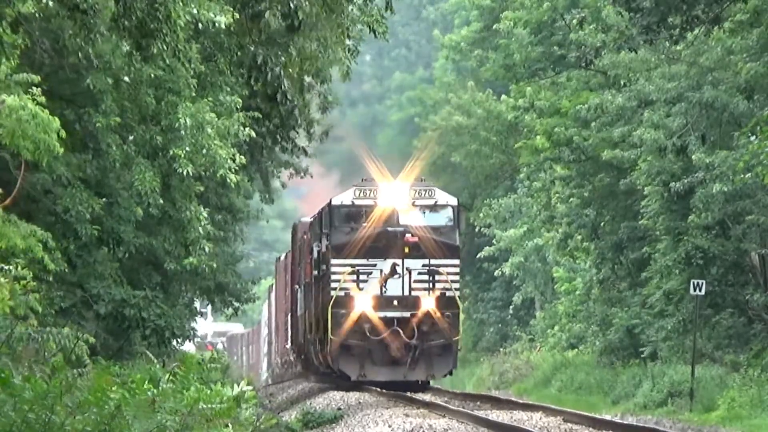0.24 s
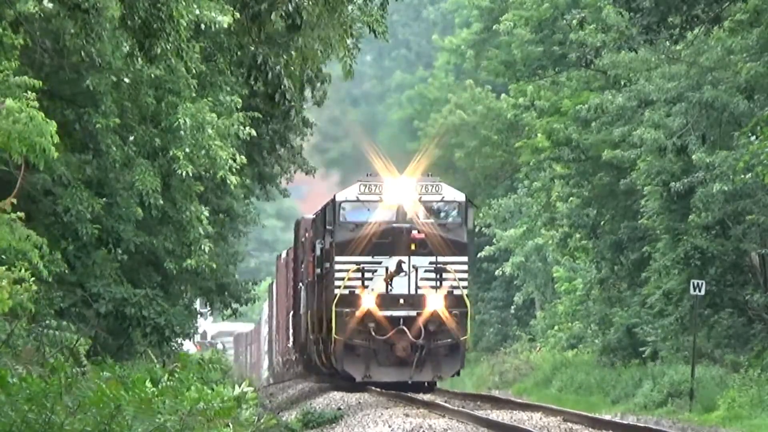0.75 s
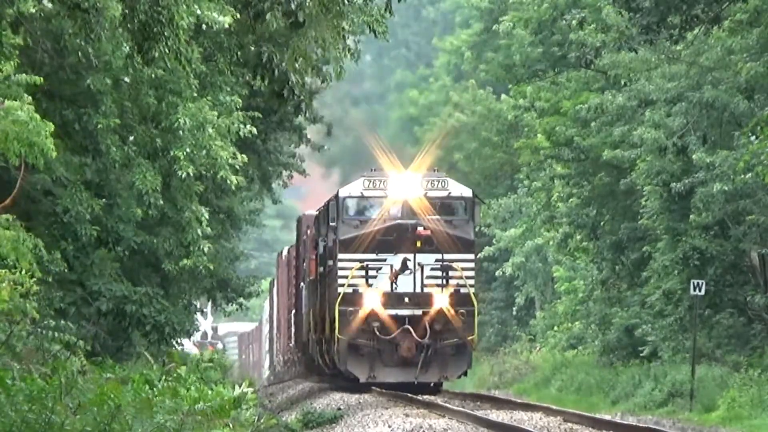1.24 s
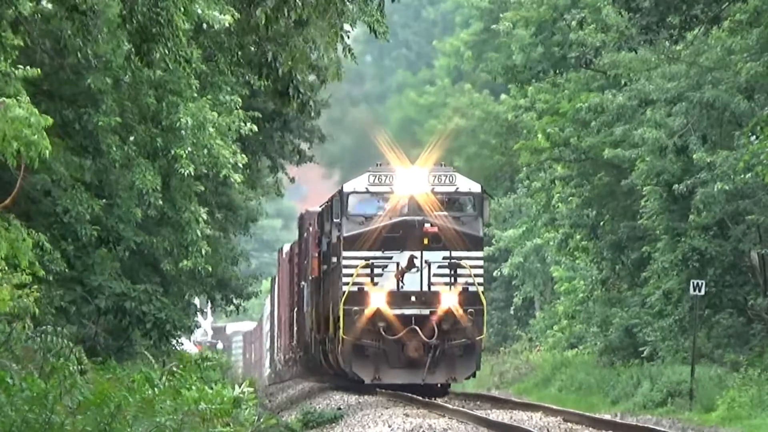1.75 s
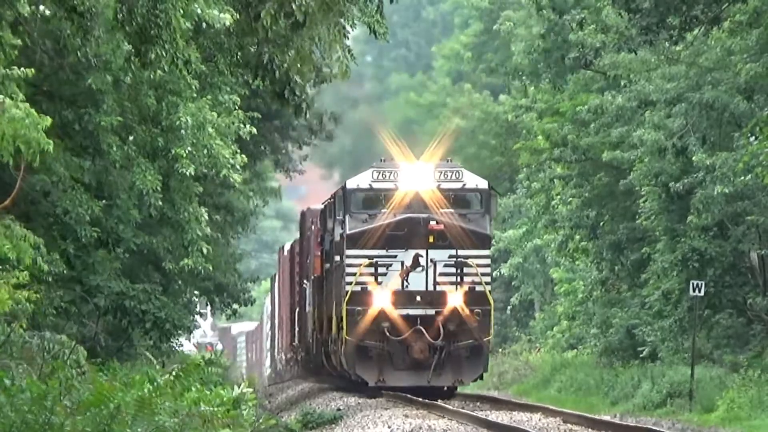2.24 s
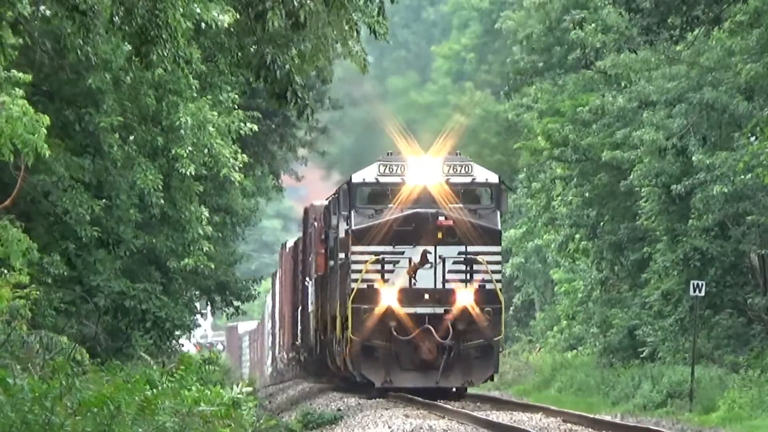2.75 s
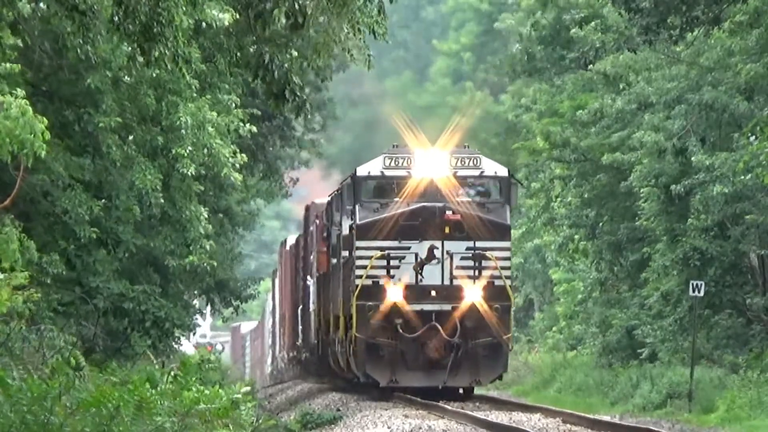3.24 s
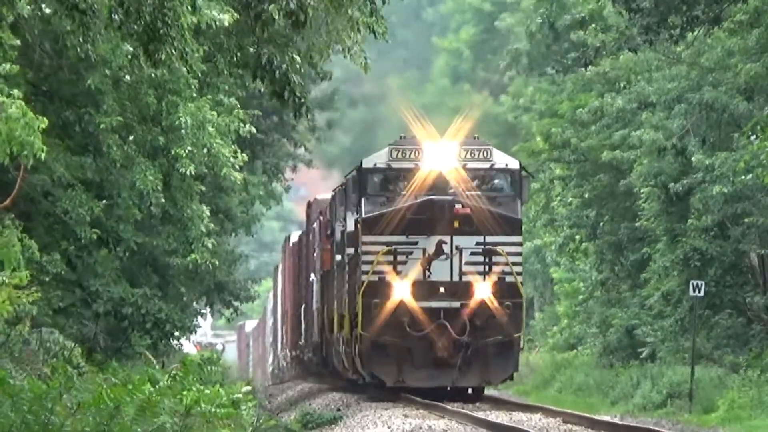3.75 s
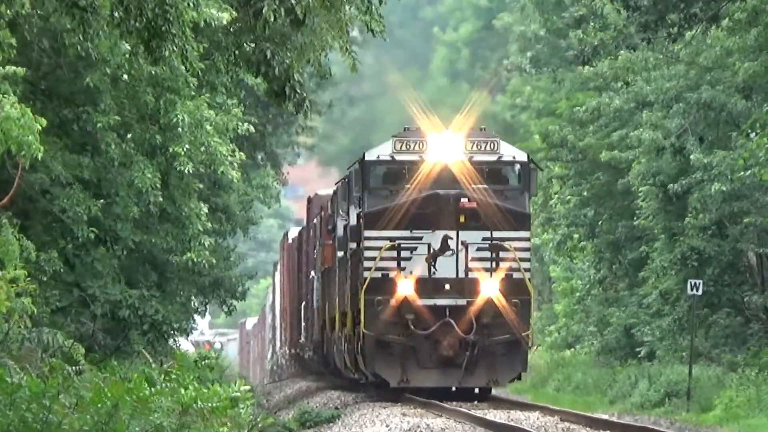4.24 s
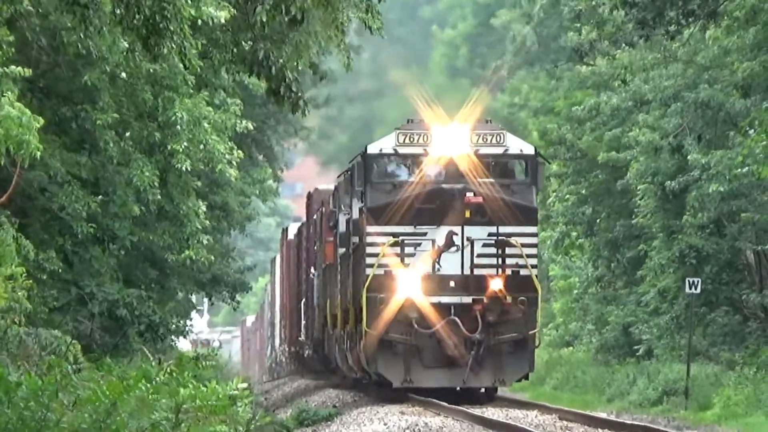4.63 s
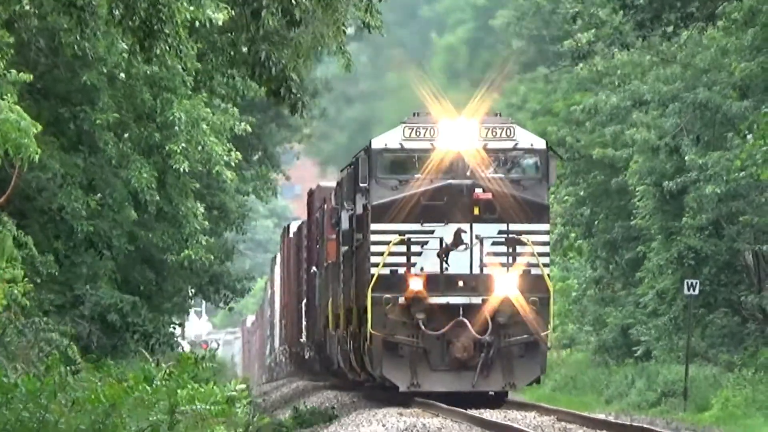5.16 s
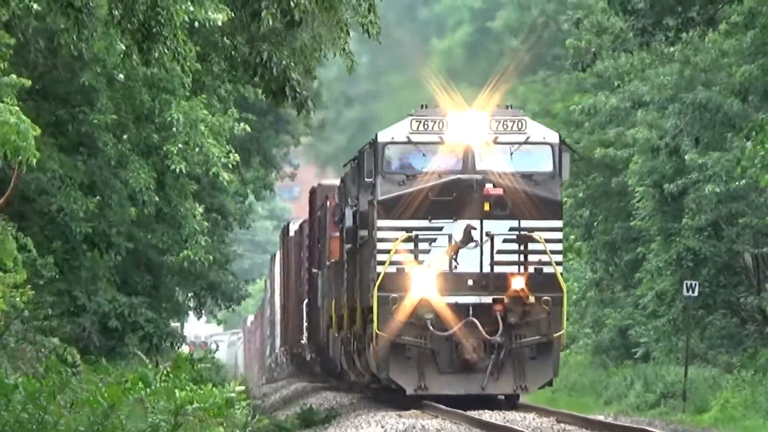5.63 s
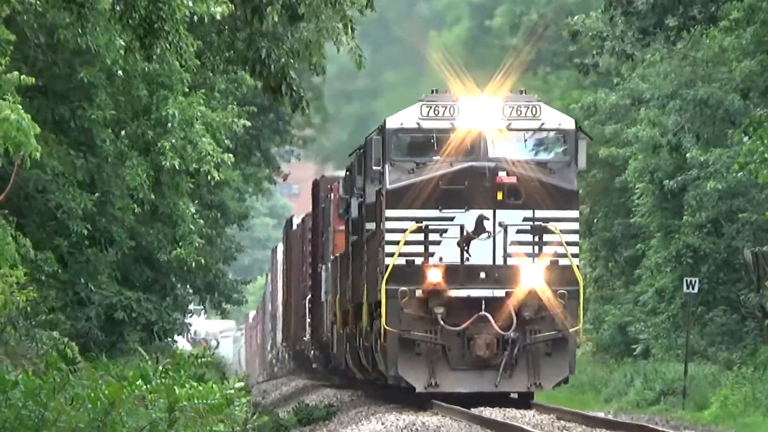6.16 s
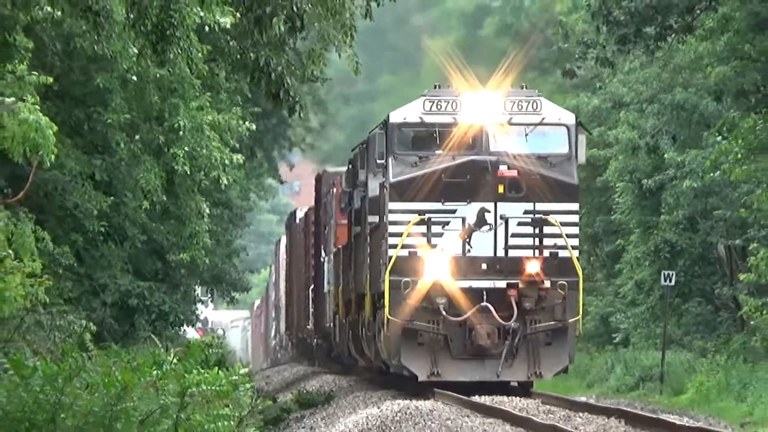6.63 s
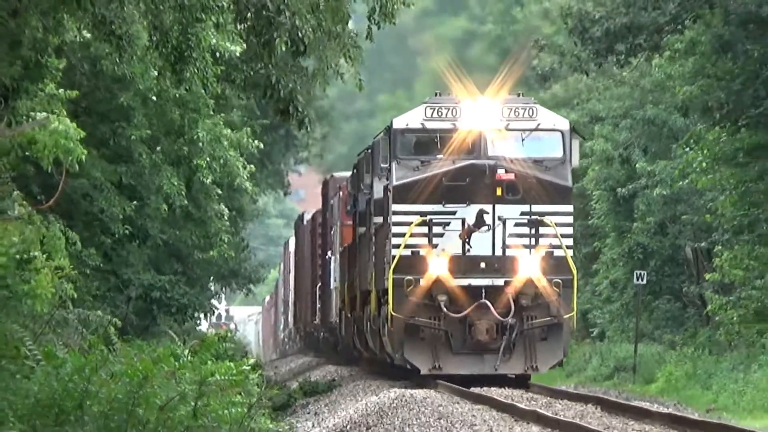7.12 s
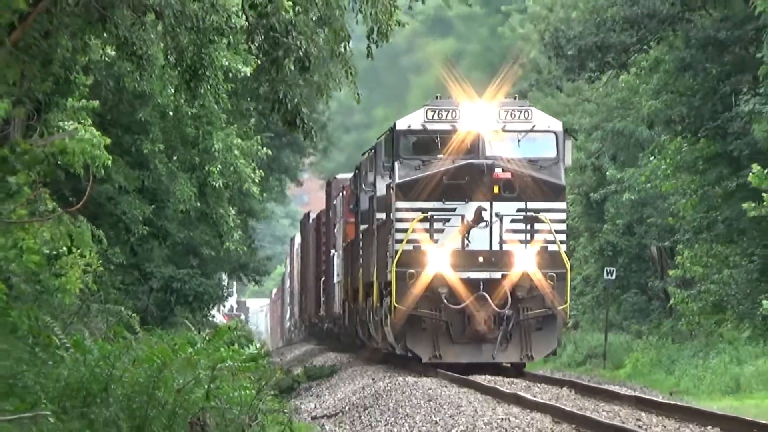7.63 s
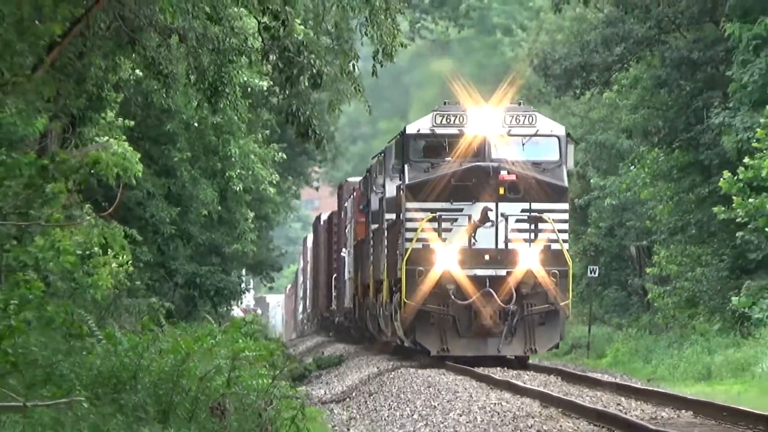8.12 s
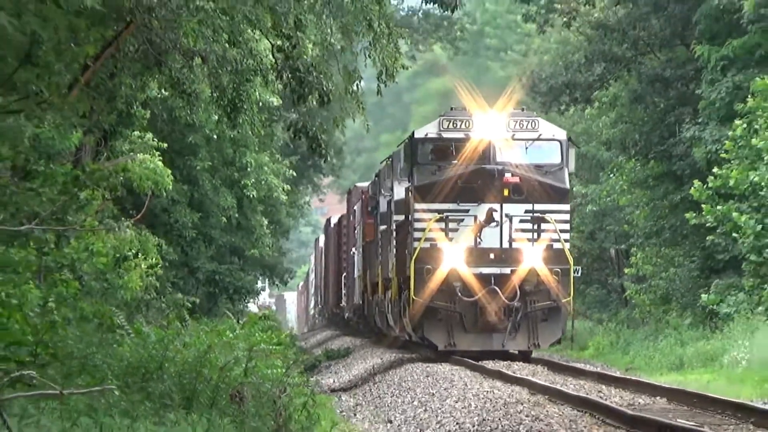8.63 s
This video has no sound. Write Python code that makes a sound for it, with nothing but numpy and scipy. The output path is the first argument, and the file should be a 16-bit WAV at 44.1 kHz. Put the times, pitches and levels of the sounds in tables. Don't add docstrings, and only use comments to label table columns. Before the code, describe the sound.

From 0 s a diesel freight locomotive drones at a distance: a steady low hum around 90 to 120 Hz, slightly rough, pulsing about eight times a second, with low rumble and muffled exhaust roar. Between 0.6 and 2.3 s a far bird gives short, gliding whistles, barely above the train, with a few last chirps near 2.7 to 3.2 s. Two soft dry twig rustles come close to the microphone around 0.9 to 1 s. From 3 to 5 s the train clears the trees; resonant panel noise and fan rush grow. At about 5.5 s there is one brief crisp rustle. By 6 to 7 s the roar is broader and brighter, with hissing steel wheels. The engine note keeps swelling, its pitch constant, until the loudest moment at 8.9 s, where everything stops suddenly. Thin electronic hiss and very faint high whine persist beneath, in open-air stereo with slightly heavier bass at right.

```python
import sys
import numpy as np
from scipy import signal
from scipy.fft import rfft, irfft, next_fast_len
from scipy.io import wavfile
from scipy.ndimage import uniform_filter1d, map_coordinates

SR = 44100
rng = np.random.default_rng(int(sys.argv[2]) if len(sys.argv) > 2 else 0)


def undo_db(level):
    steps = np.asarray(level, float) / 20
    return 10 ** steps


def generate_wav(signal):
    frames = np.transpose(np.atleast_2d(signal))
    scaled = np.clip(frames, -1, 1) * 32767
    pcm = np.round(scaled).astype(np.int16)
    wavfile.write(sys.argv[1], SR, pcm)


N = 391608
TIME = np.arange(N) / SR
CYCLE_HZ = 7.7726

# (time [s], level of the 12th order [dB])
ENGINE_NOTE = [(0, -31.1), (1.2, -29.9), (2.3, -27.6), (2.8, -28.4), (3.3, -27), (4, -27.5), (5.5, -26),
               (6.1, -23.3), (7.6, -23.1), (8, -22.5), (8.87, -19.7)]
NOTE_PARTS = {"15th": .3, "9th": -11, "6th": -16, "growl": -14}
NOTE_ECHOES = {"15th": [(1.5, .4, -1.5), (2.4, .3, -3), (3.1, .45, -3.3), (5.2, .3, 1), (6.25, .5, -3),
               (7.2, .25, -1.5), (8.9, .55, -5.6)], "9th": [(.1, .9, -8.5), (2.4, .45, -9.5),
               (6.3, .85, -9.5), (8.2, .45, -4.5)], "6th": [(1.8, .55, -7.5), (3.3, 1.1, -12),
               (8.25, .4, -5.5)], "growl": [(.8, .25, -2.5), (2.2, .8, -4), (3.3, .35, 4),
               (5.25, .35, -4.5), (6.1, .3, 2), (7.1, .25, -3), (8.1, .5, 1.5)]}
# (multiple of the cycle [1], level re the note [dB])
WEAK_ORDERS = [(3, -42), (5, -31), (7, -27), (8, -31), (10, -15), (11, -11), (13, -11.5), (14, -12),
               (16, -13), (17, -32), (18, -17), (19, -23), (20, -22), (21, -26), (22, -23), (23, -28)]
# (multiple of the cycle [1], level re the growl [dB])
GROWL_ORDERS = [(24, -10.5), (25, -22), (26, -13), (27, -4), (28, -4.5), (29, -8.5), (34, -14), (35, -13.5),
                (42, -19), (44, -25), (46, -16), (47, -15.5)]
STACK_DELAY = {5: -.15, 7: -.35, 10: .2, 11: .2, 13: -.125, 14: .2, 16: .2, 18: -.1, 19: .4, 21: .4, 22: .5,
               28: .5}
# (frequency [Hz], density [dB])
RUMBLE_SHAPE = [(12, -10), (25, 3), (40, 12), (60, 11.5), (100, 16), (125, 21.5), (140, 7), (180, 13),
                (215, 6), (250, -6), (330, -34), (800, -120)]
# (frequency [Hz], density [dB])
EXHAUST_SHAPE = [(60, -120), (120, -64), (200, 2.5), (260, -1), (370, -1.5), (460, -2), (540, -1.5),
                 (680, -6.5), (760, -10.5), (1000, -52), (2000, -120)]
# (time [s], half length [s], level [dB])
PLUME_SWAYS = [
    (.7, 0.23, -0.5),
    (3, 0.61, -0.5),
    (4.55, 0.24, -1),
    (6.1, .3, -1.5),
    (7, .2, -1.3),
    (8.05, .2, -0.5),
    (8.5, .3, .8),
]
# (time [s], level [dB])
CLEARING = [(0, 0), (2, 0.8), (3.5, 2.5), (4.5, 4), (5, 5.5), (5.6, 8), (6.4, 8.5), (7.1, 10.5), (7.9, 9.5),
            (8.87, 10.5)]
# (centre [Hz], width [Hz], far level [dB], near level [dB])
PANEL_RINGS = [(364.5, 6.3, 5.5, -1), (529, 40, -1.5, -1), (740, 13, -6, 0.5), (854, 78, 1.5, 0),
               (904, 60, 0, 0), (1018, 40, -11, -1), (1100, 22, -0.5, 0.5), (1286, 160, -2, -1),
               (1414, 104, -4, -2), (1702, 140, -2, -1), (1797, 150, -4, -4.5), (1410, 12, -4, -0.5),
               (1808, 14, -0.5, -2.5), (546.5, 12, 2, 1.5)]
# (frequency [Hz], density [dB])
FAN_SHAPE = [(500, -120), (1200, -32), (1900, -1), (2200, 0), (3200, -2.5), (4200, -4), (5300, -9),
             (5900, -15), (6500, -57), (9000, -120)]
# (frequency [Hz], density [dB])
WHEEL_SHAPE = [(1000, -120), (2500, -27), (3600, -1.5), (5200, 6), (6000, 1), (6600, -0.5), (7600, 0.5),
               (8300, -3), (9000, -4.5), (10500, -11), (12500, -21), (16000, -60)]
# (centre [Hz], width [Hz], level [dB])
BALLAST_DIPS = [(744, 17, -3), (970, 30, 2), (1124, 37, -2.5), (1502, 36, -4), (1880, 45, -0.5),
                (2296, 53, -7.5)]
# (time [s], level [dB], 60 dB decay [s])
RUSTLES = [
    (.927, -53, .12),
    (.988, -56, .15),
    (5.53, -51, .05),
]
# (frequency [Hz], density [dB])
LEAF_SHAPE = [(2000, -60), (4500, -6), (6500, 0), (9000, 0), (11500, -3), (15000, -16)]
# (time [s], length [s], start pitch [Hz], end pitch [Hz], level [dB])
BIRD_NOTES = [(.635, .05, 3550, 3300, -62), (.63, 0.041, 2950, 2650, -57), (.745, 0.073, 2600, 3050, -56),
              (1.18, 0.17, 2440, 2340, -60), (1.4, 0.22, 2200, 2330, -63), (.82, 0.089, 2850, 2100, -62),
              (3, .06, 2800, 2800, -61), (1.32, 0.036, 2200, 2400, -59), (1.62, .05, 2750, 3300, -61),
              (1.68, 0.046, 2750, 2400, -56), (1.735, 0.037, 3600, 3550, -59),
              (1.74, 0.063, 3080, 2420, -56.5), (2.2, 0.062, 3000, 2750, -57),
              (2.66, 0.042, 3000, 3000, -54), (3.205, 0.048, 4620, 4620, -61)]
# (frequency [Hz], density [dB])
HISS_SHAPE = [(1500, -20), (3000, 3), (6000, -12), (9000, -2.5), (12000, 0), (15700, -2.5)]
# (frequency [Hz], rms level [dB])
WHINE_TONES = [(7852.2, -83), (7881.8, -83), (7912, -90), (15734, -86)]
# (frequency [Hz], correlation [1])
LIKENESS = [(60, 0.78), (130, 0.9), (290, 0.75), (640, 0.64), (1410, 0.93), (3100, 0.91), (5000, 0.98),
            (8000, 0.94)]
# (frequency [Hz], left minus right [dB])
BALANCE = [(25, -13), (60, -7.5), (110, -6), (200, -2), (380, -.5), (700, .5), (1290, 1.5), (2380, -1),
           (6000, 0)]
# (frequency [Hz], phase by which left leads [rad])
LEFT_LEADS = [(60, 0.31), (340, 0.81), (860, 0.003), (1400, 0), (16000, 0.047)]


def unit(x):
    return x / np.sqrt(np.mean(x ** 2) + 1e-20)


def along(points, hz):
    f, v = np.transpose(points)
    return np.interp(np.log(hz + 1), np.log(f + 1), v)


def shape(points):
    return lambda hz: undo_db(along(points, hz))


def over_time(points):
    s, db = np.transpose(points)
    return np.interp(TIME, s, db)


def passing(rows):
    return sum(db * np.exp(-((TIME - s) / half) ** 2) for s, half, db in rows)


def wobble(rate):
    knots = rng.standard_normal(200)
    return map_coordinates(knots, [TIME[::64] * rate]).repeat(64)[:N]


def filtered(x, response):
    m = next_fast_len(N + 8192)
    return irfft(rfft(x, m) * response(np.fft.rfftfreq(m, 1 / SR)), m)[..., :N]


def rush(gain, patchy_db):
    z = signal.stft(rng.standard_normal((2, N)), nperseg=512)[2]
    field = uniform_filter1d(rng.standard_normal(z.shape[1:]), size=6, axis=0)
    field = uniform_filter1d(field, size=14, axis=1)
    pair = signal.istft(z * undo_db(patchy_db * unit(field)), nperseg=512)[1][:, :N]

    def spread(hz):
        turn = np.arccos(np.clip(along(LIKENESS, hz), -1, 1)) / 2
        return gain(hz) * np.array([np.cos(turn), np.sin(turn)])

    mid, side = filtered(pair, spread)
    return np.array([mid + side, mid - side]) / np.std(mid)


def order(multiple, sway_db, drift):
    strongest_s = .0608
    cycles = multiple * CYCLE_HZ * (TIME - strongest_s) - STACK_DELAY.get(multiple, 0)
    bank = 1 if multiple % 12 == 6 else -1
    level = bank * np.sqrt(2) * undo_db(sway_db * wobble(1.4))
    return level * np.cos(2 * np.pi * cycles + drift * wobble(1.17))


def drone():
    main_db = over_time(ENGINE_NOTE)
    part_db = {name: main_db + db + passing(NOTE_ECHOES[name]) for name, db in NOTE_PARTS.items()}
    note = undo_db(main_db) * order(12, sway_db=0, drift=.06)
    note = note + undo_db(part_db["15th"]) * order(15, sway_db=0, drift=.1)
    note = note + undo_db(part_db["9th"]) * order(9, sway_db=0, drift=.9)
    note = note + undo_db(part_db["6th"]) * order(6, sway_db=0, drift=.4)
    nearness_db = uniform_filter1d((main_db + part_db["15th"]) / 2, size=SR, mode="nearest")
    weak = sum(undo_db(db) * order(k, sway_db=1.2, drift=.2) for k, db in WEAK_ORDERS)
    growl = sum(undo_db(db) * order(k, sway_db=2, drift=.9) for k, db in GROWL_ORDERS)
    growl = undo_db(part_db["growl"] - 0.5) * growl
    rumble = undo_db(nearness_db - 11) * rush(shape(RUMBLE_SHAPE), patchy_db=.5)
    return note + blower(nearness_db) + undo_db(nearness_db) * weak + growl + rumble


def blower(nearness_db):
    level_db = nearness_db - 29.5 + 2.5 * wobble(1.1)
    return undo_db(level_db) * np.sin(2 * np.pi * 26.2 * TIME + .8 * wobble(.9))


def roar():
    angle = 2 * np.pi * CYCLE_HZ * TIME
    beat = np.cos(angle - 1.2 + 1.5 * wobble(0.61))
    beat = beat + .5 * np.cos(2 * angle - 2.1) + .5 * np.cos(3 * angle - .7)
    gust = wobble(9)
    open_db = over_time(CLEARING)
    near = np.pi / 2 * np.clip((TIME - 4) / 2.6, 0, 1)
    train = exhaust(beat) + bodywork(open_db, near, beat, gust)
    train = train + fans(open_db, near, beat, gust) + wheels(open_db, beat, gust)

    def ballast(f):
        return undo_db(sum(db * np.exp(-((f - c) / (w / 2)) ** 2) for c, w, db in BALLAST_DIPS))

    return filtered(train, ballast)


def exhaust(beat):
    engine_db = over_time(ENGINE_NOTE)
    level_db = -39.5 + 0.68 * (engine_db - engine_db[0]) + passing(PLUME_SWAYS)
    return undo_db(level_db + 0.22 * beat) * rush(shape(EXHAUST_SHAPE), patchy_db=.5)


def bodywork(open_db, near, beat, gust):
    screen_db = -3.5 * np.exp(-TIME / 1.44)
    level_db = -38.5 + 0.59 * open_db + screen_db
    far_ring = np.cos(near) * rush(panels(column=0), patchy_db=.5)
    near_ring = np.sin(near) * rush(panels(column=1), patchy_db=.5)
    return undo_db(level_db + 0.067 * beat + 0.12 * gust) * (far_ring + near_ring)


def panels(column):
    def gain(f):
        power = sum(undo_db(2 * dbs[column]) / (1 + ((f - c) / (w / 2)) ** 2) for c, w, *dbs in PANEL_RINGS)
        return np.sqrt(power) / (1 + (f / 2300) ** 6) * (f > 200)

    return gain


def fans(open_db, near, beat, gust):
    level = undo_db(-44.5 + open_db + 0.54 * beat + 0.1 * gust)
    clear = level * rush(shape(FAN_SHAPE), patchy_db=0.64)
    dulled = filtered(clear, lambda f: undo_db(1.84 - 3.5 * (f / 4500) ** 2))
    return dulled + np.sin(near) ** 2 * (clear - dulled)


def wheels(open_db, beat, gust):
    level_db = -58 + 1.17 * open_db
    return undo_db(level_db + 0.49 * beat + 0.21 * gust) * rush(shape(WHEEL_SHAPE), patchy_db=0.74)


def twig():
    puffs = sum(undo_db(db - 60 * np.abs(TIME - s) / t60) * (TIME > s) for s, db, t60 in RUSTLES)
    return puffs * unit(filtered(rng.standard_normal(N), shape(LEAF_SHAPE)))


def bird():
    song = np.zeros(N)
    for s, length, start_hz, end_hz, db in BIRD_NOTES:
        count = round(length * SR)
        pitch = np.linspace(start_hz, end_hz, count)
        whistle = np.hanning(count) * np.sin(2 * np.pi * np.cumsum(pitch) / SR)
        song[round(s * SR):][:count] += undo_db(db + 13.5) * whistle
    trees = rng.standard_normal((2, SR // 4)) * undo_db(-60 * TIME[:SR // 4] / 0.41)
    trees = trees / np.linalg.norm(trees[0])
    echoes = signal.fftconvolve(song[None], trees, axes=1)[:, :N]
    return song + undo_db(-2.5) * echoes


def camera():
    def band(hz):
        return shape(HISS_SHAPE)(hz) * (hz > 1500) * (hz < 15745)

    hiss = undo_db(-62.0) * unit(filtered(rng.standard_normal(N), band))
    whine = sum(np.sqrt(2) * undo_db(db) * np.sin(2 * np.pi * hz * TIME) for hz, db in WHINE_TONES)
    return hiss + whine


def scene():
    return drone() + roar() + twig() + bird()


def band_limit(x):
    return signal.sosfilt(signal.butter(12, 15745, fs=SR, output="sos"), x)


def record(dry):
    side = np.array([[.5], [-.5]])

    def ports(hz):
        return undo_db(side * along(BALANCE, hz)) * np.exp(1j * side * along(LEFT_LEADS, hz))

    stop = np.clip((N / SR - TIME) / .006, 0, 1)
    return band_limit(stop * (filtered(dry, ports) + camera()))


dry = scene()
out = record(dry)
generate_wav(out)
```